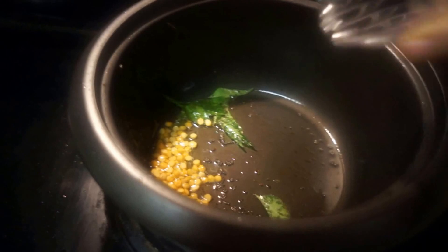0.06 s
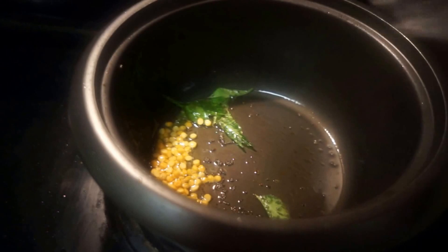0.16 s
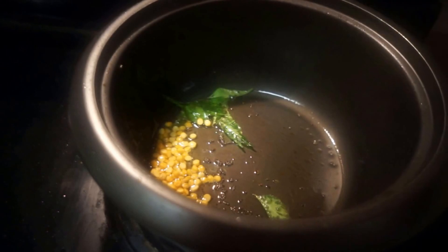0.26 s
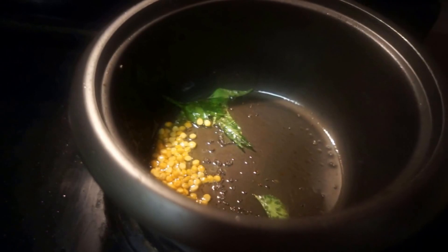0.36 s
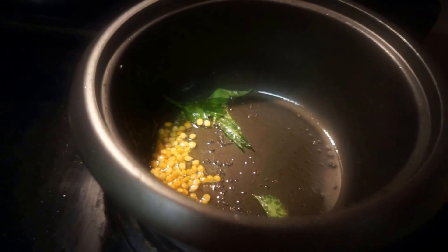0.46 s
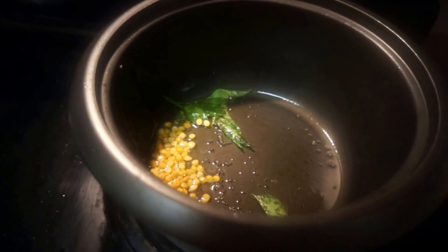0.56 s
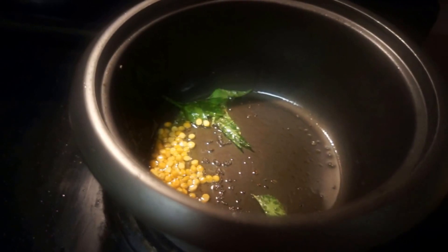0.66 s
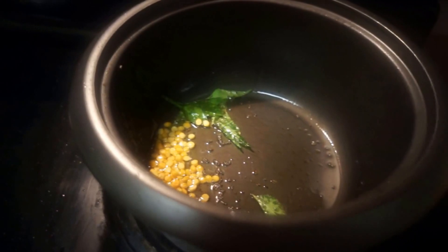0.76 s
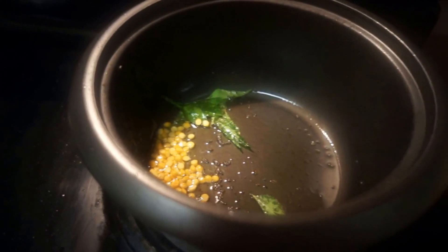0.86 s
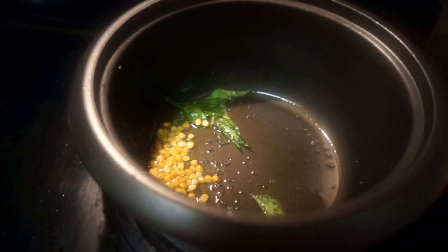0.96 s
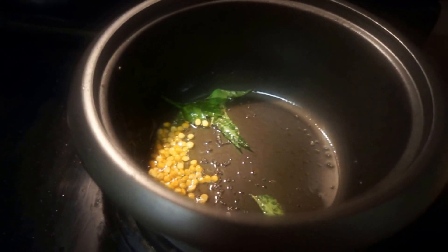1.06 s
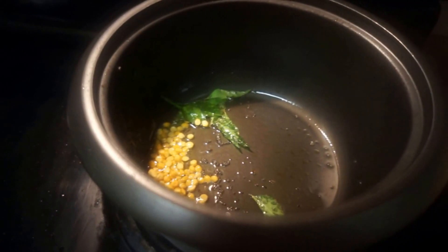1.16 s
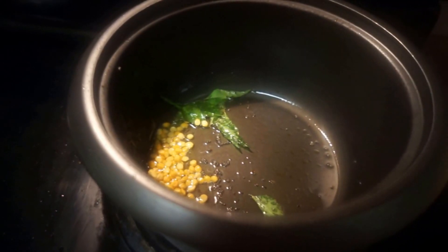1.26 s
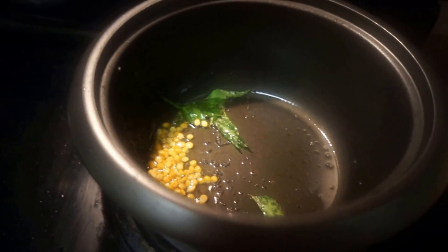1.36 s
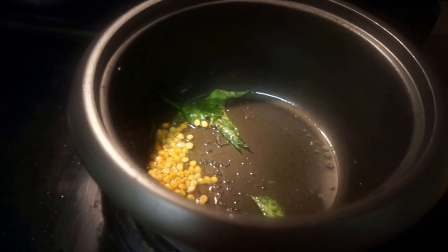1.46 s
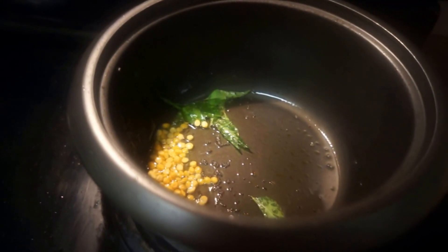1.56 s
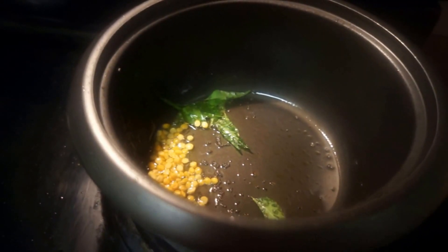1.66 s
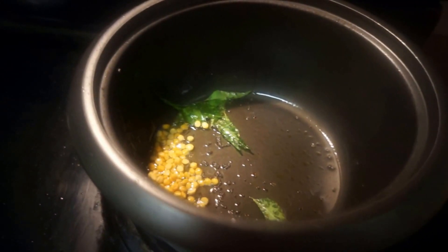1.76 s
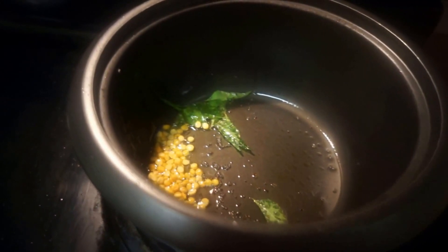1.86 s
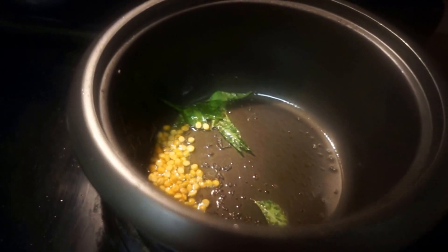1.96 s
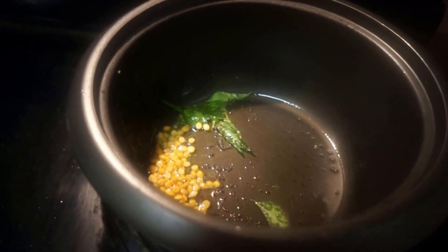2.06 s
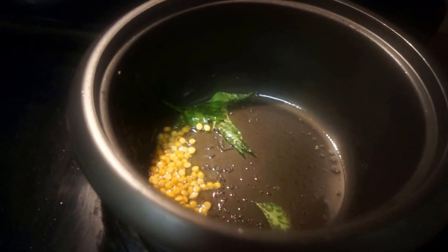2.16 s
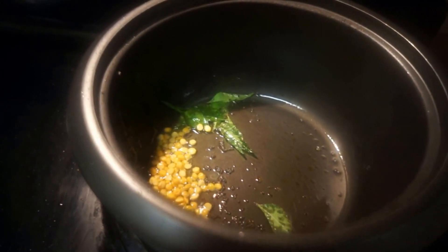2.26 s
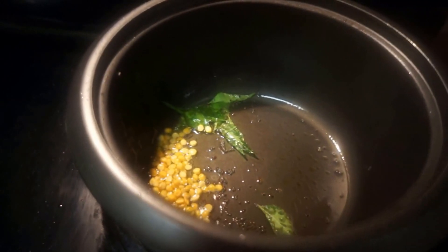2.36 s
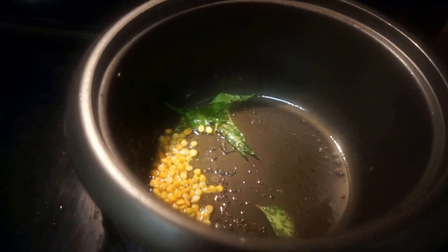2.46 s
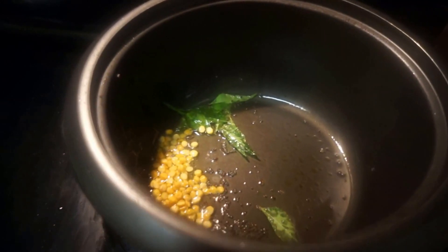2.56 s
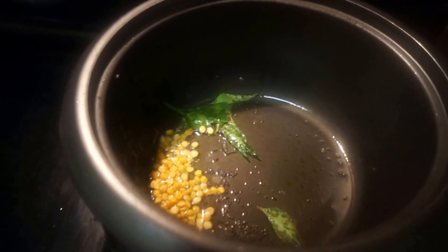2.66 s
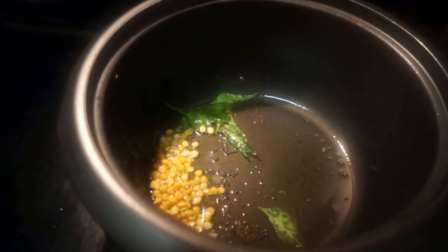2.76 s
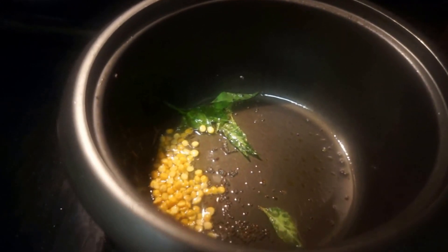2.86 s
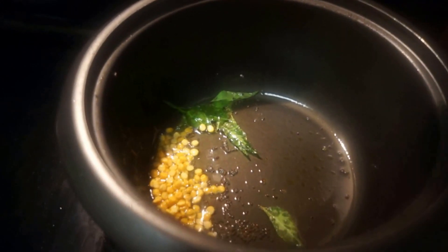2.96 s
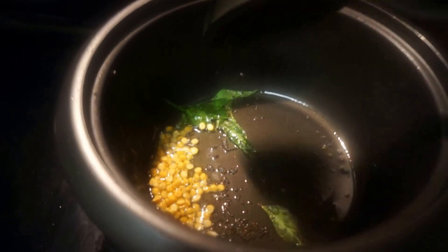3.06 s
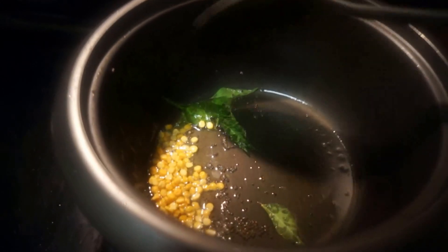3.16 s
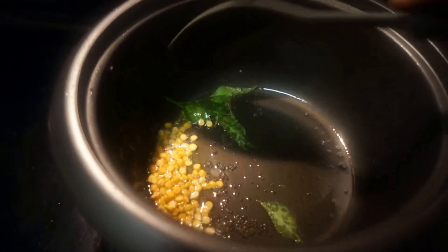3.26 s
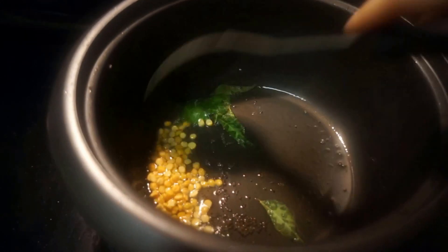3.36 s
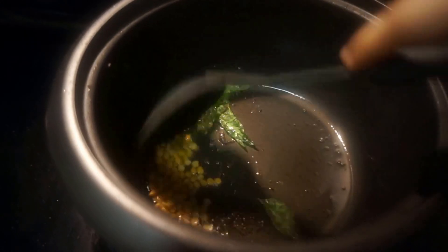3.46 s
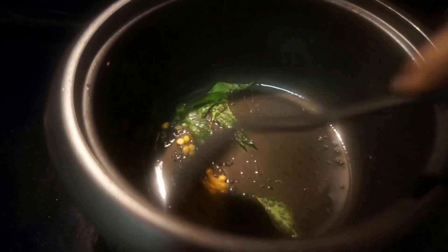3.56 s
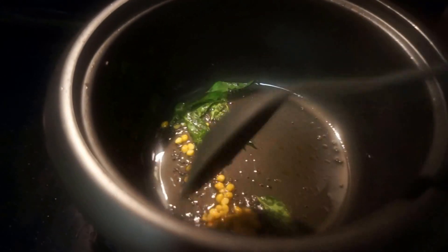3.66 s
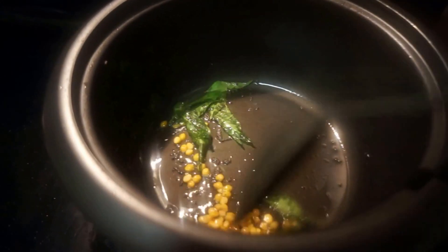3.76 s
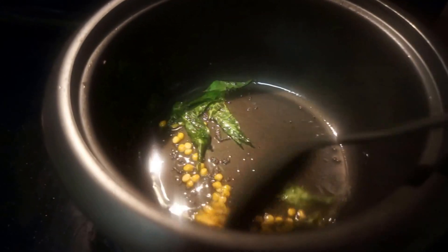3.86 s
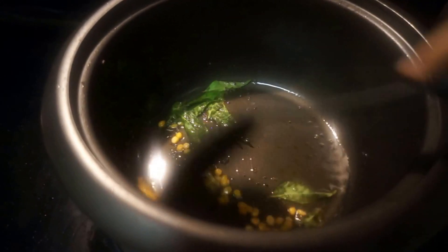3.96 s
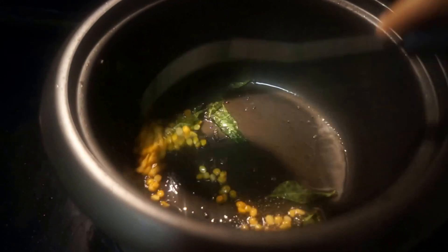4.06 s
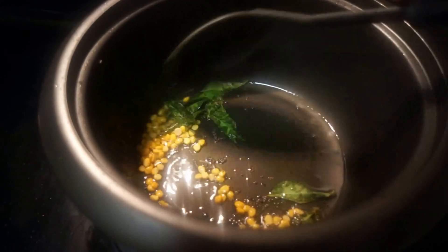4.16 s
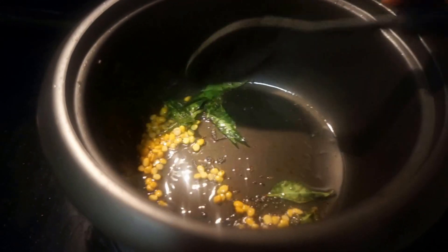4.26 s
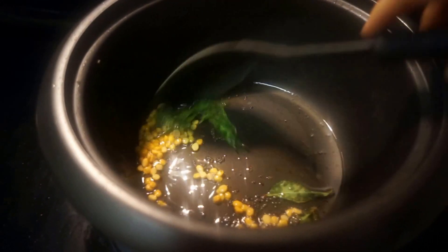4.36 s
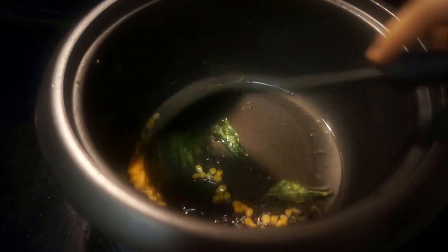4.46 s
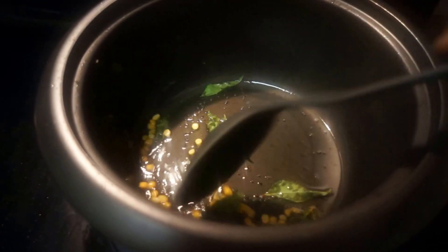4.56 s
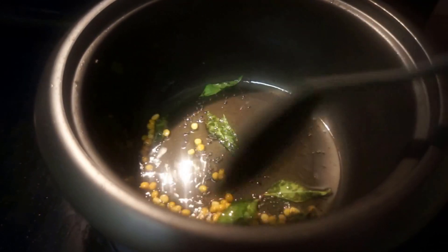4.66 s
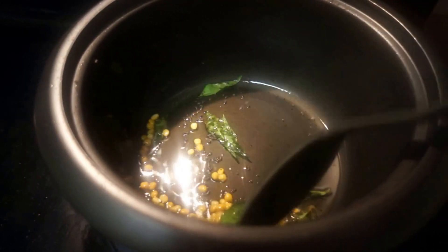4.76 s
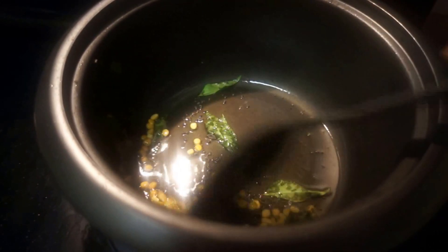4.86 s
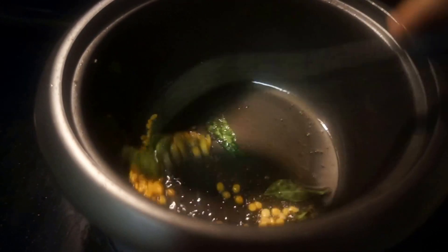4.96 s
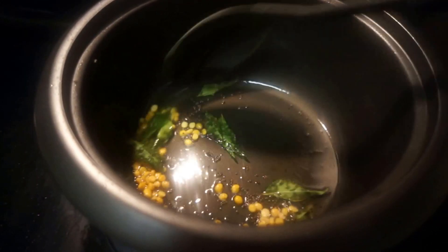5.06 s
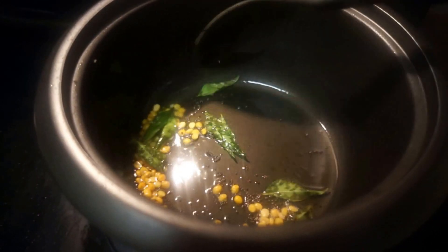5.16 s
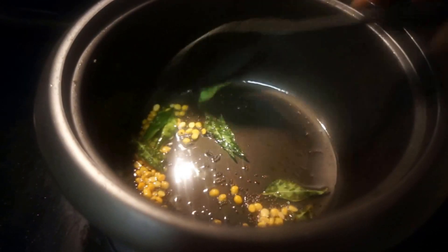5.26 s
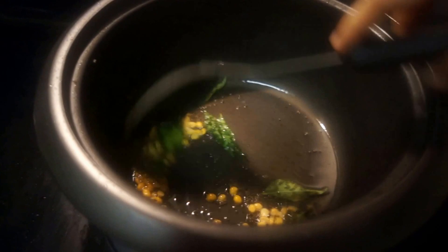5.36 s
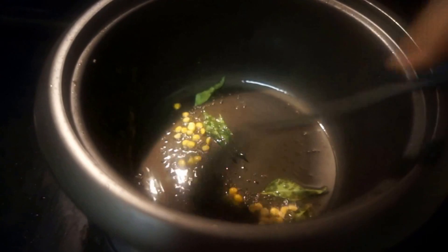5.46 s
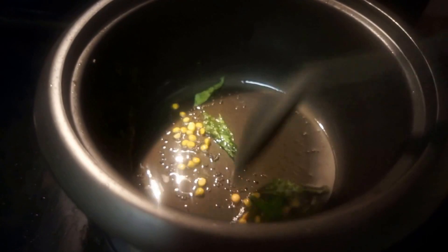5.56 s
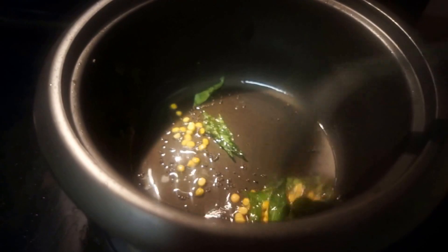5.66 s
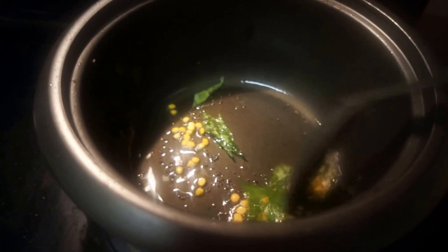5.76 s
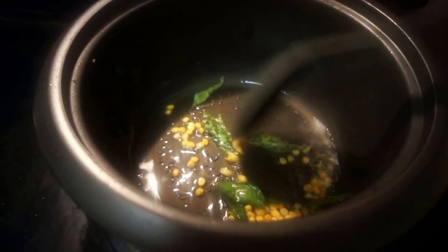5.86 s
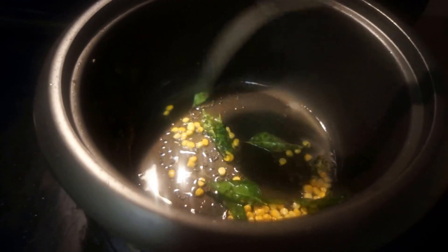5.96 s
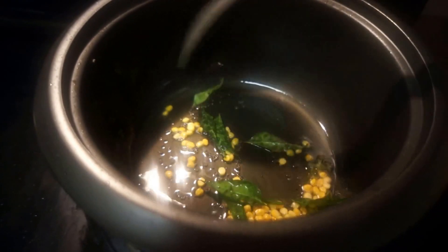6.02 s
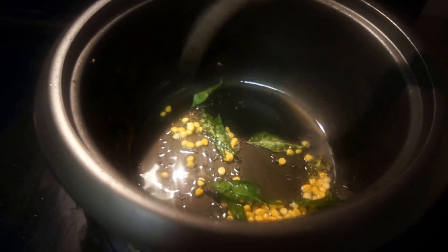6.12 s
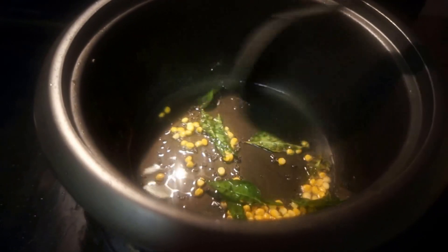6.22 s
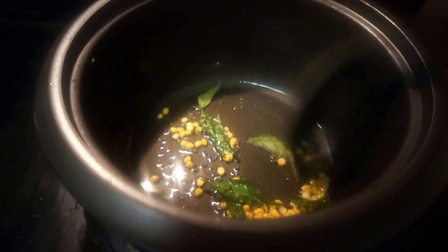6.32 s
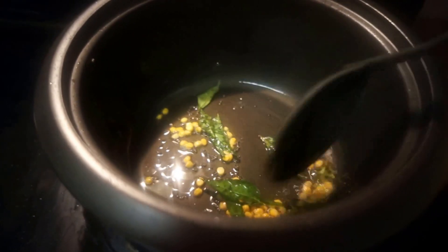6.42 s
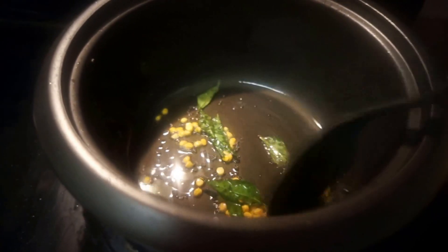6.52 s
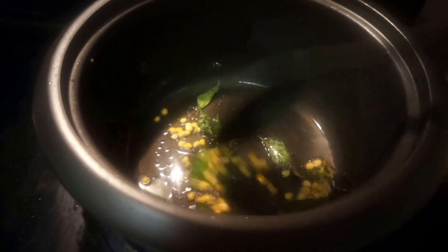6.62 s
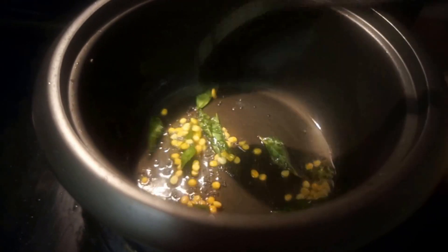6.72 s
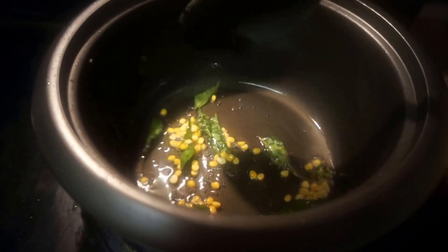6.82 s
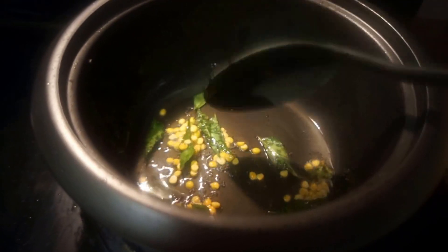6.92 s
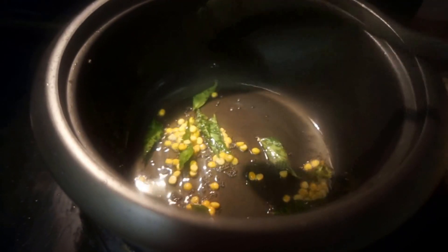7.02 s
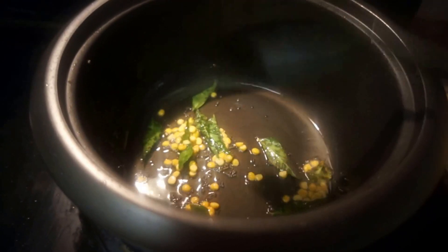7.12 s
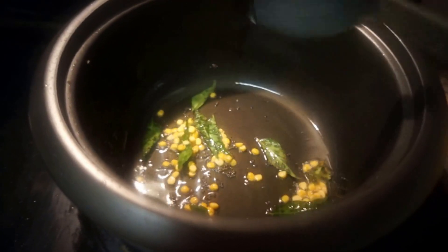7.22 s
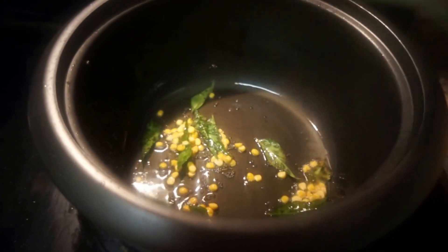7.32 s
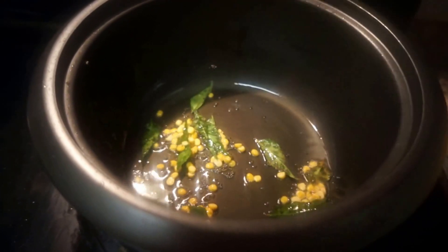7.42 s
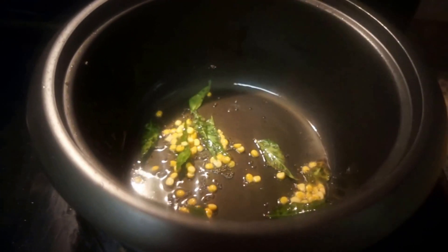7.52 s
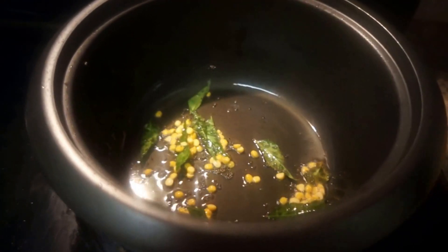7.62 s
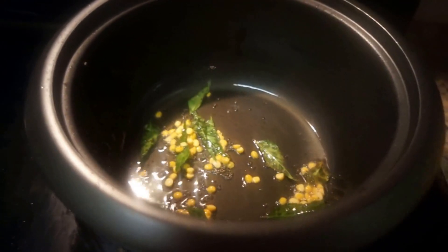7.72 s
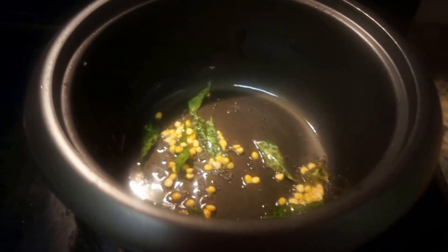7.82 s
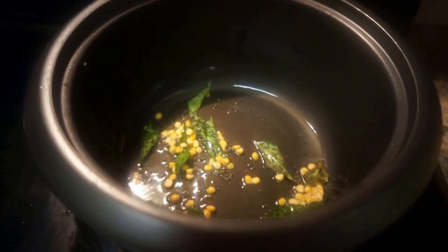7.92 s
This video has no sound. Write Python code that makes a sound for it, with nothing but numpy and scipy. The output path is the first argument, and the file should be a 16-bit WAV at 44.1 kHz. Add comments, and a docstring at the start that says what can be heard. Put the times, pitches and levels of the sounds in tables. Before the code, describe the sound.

Close to a steel pot in a small kitchen, a thin, crisp sizzle with sharp seed pops slowly grows louder. A dish is set down on the counter with a clack and dull knocks. Then a steel spoon stirs in quick strokes, scraping the bottom, knocking hollowly and rattling lentils, its handle ringing briefly on the rim. Stirring stops, the sizzle stays, and something thuds on the counter.

```python
"""Seeds, lentils and leaves fry in hot oil in a steel pot: the sizzle is a dense train of bubble clicks
coloured by the resonances of the air in the pot, and seeds burst as short noise with a pitch of their own.
A steel spoon stirs: random slips scrape the pot's bottom and the spoon's edge, lentils rattle, and the spoon
bumps, clacks, squeaks and taps as struck resonances; friction rings its handle on the rim. A dish and other
things are put down on the counter with dull knocks and a hard tick, a bowl rings faintly, and low noise
fills a small kitchen."""
import sys
import numpy as np
from scipy import signal
from scipy.fft import rfft, irfft, next_fast_len
from scipy.io import wavfile

SR = 44100
rng = np.random.default_rng(int(sys.argv[2]) if len(sys.argv) > 2 else 0)


def master_out(mix):
    """Clip the mix to full scale and print it as 16-bit PCM to the path in sys.argv[1]."""
    frames = np.transpose(np.atleast_2d(mix))
    ceiling = np.clip(frames, -1, 1)
    pcm = np.round(ceiling * 32767).astype(np.int16)
    wavfile.write(sys.argv[1], SR, pcm)


N = 352270

# Levels are those of the separate layers, ahead of the room and of the compression in record().
# Low noise of burner and house, its spectrum: (frequency [Hz], relative density [dB])
RUMBLE_SPECTRUM = [(12, -22), (20, 2.5), (87, -1), (123, 0.5), (196, -8), (340, -12.5), (560, -9.5),
                   (850, -12.5), (1160, -16.5), (2500, -19), (3250, -48), (5500, -120)]
# Levels of sizzle and low noise as heard, lifted by the recorder's rising gain:
# (time [s], sizzle level [dB], rumble level [dB])
STEADY_LEVELS = [(0.0, -53, -61.5), (1.31, -49.5, -54.5), (1.95, -48, -53), (2.39, -45.5, -49),
                 (2.77, -42.5, -50.5), (3.25, -46.5, -46.5), (5.0, -39.5, -43), (6.95, -37, -43.5),
                 (7.988, -36.5, -45)]
# Things put down on the counter: (time [s], peak [dB], centre [Hz], t60 [s], at most 0.4 in use)
COUNTER_KNOCKS = [(1.353, -39, 179, 0.055), (1.373, -39, 546, 0.17), (1.471, -30, 600, 0.079),
                  (1.485, -25.5, 560, 0.059), (1.96, -30.5, 665, 0.096), (2.095, -32.5, 91, 0.04),
                  (2.29, -45, 228, 0.61), (2.357, -27.5, 337, 0.43), (2.47, -36, 870, 0.22),
                  (7.798, -29.5, 627, 0.29), (7.912, -22, 590, 0.2)]
# The dish lands and rocks: (time [s], peak [dB])
DISH_HITS = [(1.5051, -11.5), (1.513, -18), (1.532, -19.5)]
# Resonances of the dish: (frequency [Hz], width [Hz], gain [dB])
DISH_MODES = [(600, 90, 0), (850, 200, -3), (1195, 60, 6), (1400, 60, 7), (1453, 18, 12), (1550, 60, 4),
              (1790, 70, 3), (1960, 120, 2), (2760, 700, -10), (4810, 62, -12)]
# A small steel bowl rings in the hand, one row: (time [s], peak [dB], frequency [Hz], t60 [s])
BOWL_RING = (.07, -59, 1850, 3.0)
# The handle slides on the rim:
# (time [s], duration [s], hiss level [dB], ringing drive [dB], tilt of the ringing [dB per octave])
HANDLE_SLIDES = [(3.262, 0.165, -34, -54.5, -3.5), (6.225, 0.112, -21.5, -37, 0.5)]
# Modes of the spoon: (frequency [Hz], gain [dB])
SPOON_MODES = [(1846, 0), (2310, -6), (2557, -3), (3120, -6), (3402, -6), (3741, -3), (4210, -9), (5082, 2),
               (5467, -2), (5618, 3), (5905, -6), (6223, -5), (6519, 2), (6799, 1), (7881, -2), (9588, -7)]
# Hard ticks: a clack at the counter, then the spoon's edge or a lentil on steel:
# (time [s], peak [dB], pitch [Hz])
HARD_TICKS = [(2.359, -30.5, 1600), (3.3565, -22, 5400), (3.394, -9, 2800), (3.823, -28, 1940),
              (3.929, -17, 2320), (4.3869, -14, 5060), (5.2874, -11, 3390), (5.2896, -10.5, 2200),
              (5.727, -20, 1800), (5.7438, -15.5, 1800), (5.7602, -8.5, 1780), (6.1308, -12.5, 1680),
              (6.504, -20, 1850), (6.551, -10, 1760), (6.691, -14.5, 1560), (6.767, -19, 1610),
              (6.838, -19, 1590)]
# The spoon bumps the bottom, or its edge squeaks and taps (the high pitches):
# (time [s], peak [dB], pitch [Hz])
SPOON_BUMPS = [(3.383, -17.5, 450), (3.464, -1.5, 594), (3.546, -4.5, 553), (3.671, -14.5, 566),
               (3.848, -6, 540), (3.982, -3.5, 620), (4.299, -3.5, 617), (4.345, -7, 530), (4.436, -4, 600),
               (4.483, 0, 570), (4.887, -11, 576), (4.919, -11, 676), (5.343, -5, 580), (5.363, -2.5, 600),
               (5.378, -2.5, 576), (5.405, -2, 600), (5.472, -2.5, 597), (5.487, -6.5, 770),
               (5.562, -12.5, 920), (5.621, -14, 810), (5.759, -20, 706), (5.778, -5.5, 760),
               (5.841, -10, 740), (6.127, -20.5, 380), (6.178, -3, 710), (6.193, -4.5, 614),
               (6.204, -5, 555), (6.277, -11.5, 585), (6.288, -10.5, 710), (6.326, -6, 1776),
               (6.346, -22, 1810), (6.549, -12, 367), (6.575, -7.5, 437), (6.692, -14, 640),
               (6.764, -17, 600), (6.799, -21, 615), (6.836, -16.5, 675), (6.969, -30.5, 1610),
               (7.04, -30.5, 1620), (7.114, -30.5, 565), (7.176, -35.5, 898), (7.214, -34, 816),
               (7.243, -33.5, 510)]
# Strokes of the spoon: (landing time [s], push duration [s], scrape of the bottom [dB],
# grind of the edge [dB], rattle of the lentils [dB], fade [dB per s])
SPOON_STROKES = [(3.364, 0.031, -29, -25, -32, 253), (3.445, 0.072, -17.5, -27, -29.5, 68),
                 (3.82, 0.12, -16, -22, -25.5, 127), (4.17, 0.12, -38.5, -41.5, -62.5, 152),
                 (4.294, 0.11, -23.5, -31, -38, 150), (4.378, 0.15, -22, -28.5, -26, 120),
                 (4.761, 0.14, -21, -23.5, -25, 79), (5.171, 0.048, -23.5, -37, -35, 202),
                 (5.274, 0.057, -24.5, -25, -26.5, 227), (5.352, 0.16, -20, -24, -26.5, 83),
                 (5.741, 0.1, -16, -23, -34, 82), (6.116, 0.024, -22.5, -35, -22.5, 200),
                 (6.167, 0.16, -20.5, -26, -55, 144), (6.494, 0.076, -28, -23.5, -28, 203),
                 (6.545, 0.062, -17, -21.5, -29.5, 107), (6.751, 0.015, -27, -51, -48, 64)]
# Level gained while the spoon speeds up: (bottom [dB], edge [dB], lentils [dB])
SPEED_UP_DB = [4, 4.5, 8]
# Resonances of the pot's bottom and wall: (frequency [Hz], width [Hz], gain [dB])
BOTTOM_MODES = [(89, 38, -16.5), (219, 35.5, -9.5), (329.7, 42, -6.5), (406.7, 13.3, 0), (538, 62, -1.5),
                (600, 58.5, -0.5), (766.5, 30, -1), (850, 144, -9), (1023, 81, -6.5), (1224, 192, -11)]
# Resonances heard at the spoon's edge: (frequency [Hz], width [Hz], gain [dB])
EDGE_MODES = [(1640, 92, -8), (1810, 40, 0), (1847, 204, -6.5), (2400, 146, -9), (2850, 1600, -15)]
# Resonances of the air inside the pot: (frequency [Hz], width [Hz], gain [dB])
AIR_MODES = [(1810, 174, -7), (3830, 2470, -6), (4050, 180, 2.5), (4940, 310, -10.5), (5706, 240, 4.5),
             (7320, 620, -2), (8080, 100, 7.5), (8550, 1670, -2.5), (10915, 360, -10.5)]
# Bursting seeds, and a few low clacks of the spoon:
# (time [s], peak [dB], own pitch [Hz], share of that pitch against the crack [dB])
POPS_AND_CLACKS = [(0.0218, -15, 9460, -2.5), (0.07, -21, 8200, 17), (0.241, -26, 9000, 5),
                   (0.292, -23, 5700, -8), (0.366, -27, 9150, 0), (0.42, -23.5, 2400, -4.5),
                   (0.5166, -11.5, 8160, -1), (0.624, -22, 8240, -3), (0.741, -34.5, 7520, -5),
                   (0.777, -8.5, 4030, 0.5), (1.003, -23, 9700, 0), (1.3098, -15, 8740, 0.5),
                   (1.3313, -16, 6300, -11), (1.741, -23, 7740, 10), (1.9625, -14.5, 4000, 4.5),
                   (2.119, -8.5, 6540, 2), (2.327, -30, 5960, -29), (2.5043, -13.5, 5900, 6),
                   (2.586, -28, 8250, -12), (2.7121, -7, 3400, 3.5), (3.375, -10.5, 5200, 2),
                   (3.7123, -10, 10360, 18), (3.751, -3.5, 7800, 4.5), (3.8113, -9, 6750, 12.5),
                   (4.0058, -7, 7560, 9), (4.052, -7, 7950, -20), (4.101, -12, 8250, 5),
                   (4.1404, -21, 7900, 34), (4.1565, -9.5, 9600, 7), (4.2, -7, 8950, 22),
                   (4.27, -14.5, 7450, 5), (4.346, -9.5, 7860, 30), (4.978, -10.5, 7100, 5),
                   (5.09, -4, 4000, -4.5), (5.177, -15, 7880, -15), (5.2214, -13, 8450, 5),
                   (5.235, -2.5, 4900, -2), (5.844, -8, 3580, 0), (5.863, -2.5, 2400, -4),
                   (6.0357, -12, 5900, 7), (6.092, -6, 7700, 7), (6.1514, -9.5, 7700, 51),
                   (6.353, -0.5, 4300, -6), (6.459, -11, 4220, 2), (6.74, -10, 9300, 9),
                   (6.8018, -8.5, 2400, -3), (7.2806, -8, 9600, -8)]
# Thin rings of the pot's wall, strongest for pops of a near pitch: (frequency [Hz])
WALL_RINGS_HZ = [3187, 3338, 3920, 4180]

KITCHEN_T60_S, WALL_CUT_HZ = 0.56, 1600   # reverberation of the lows; above the cut it shortens
SPOON_T60_S = 0.1
SLIDE_EDGE_S, HISS_FALLS_DB = 0.0073, 9
LAND_S, SPEED_UP_S = 0.0034, 0.1          # the spoon bites at once, then gathers speed
BUMP_WIDTH_HZ, BUMP_RUB_DB, BUMP_EDGE_DB = 270, -25.5, -13.5   # damped ring, friction, spoon's edge
WALL_WIDTH_HZ = 20
MIC_TOP_HZ, CUTOFF_HZ = 11050, 12349


def amp(db):
    """Level as amplitude: 20 dB is a factor of ten."""
    return 10 ** (np.asarray(db) / 20)


def rms_one(x):
    """Normalization to unit effective value."""
    return x / np.sqrt(np.mean(x ** 2) + 1e-20)


def in_time(rows):
    """Linear interpolation of a table's columns, sample by sample."""
    times, *columns = np.transpose(rows)
    return [np.interp(np.arange(N) / SR, times, column) for column in columns]


def drift(rate_hz):
    """Low-passed noise: slow chance of spread 1, drawn at every 20th sample."""
    r = np.exp(-40 * np.pi * rate_hz / SR)
    noise = rng.standard_normal(N // 20 + 2002)
    slow = signal.lfilter([1], [1, -2 * r, r * r], noise)[2000:]   # the filter has settled
    return np.interp(np.arange(N) / 20, np.arange(len(slow)), rms_one(slow))


def resonate(x, hz, width_hz):
    """Simple damped resonator: a pole pair with a gain near 1 at its peak."""
    r = np.exp(-np.pi * width_hz / SR)
    zeros = [(1 - r * r) / 2, 0, (r * r - 1) / 2]
    poles = [1, -2 * r * np.cos(2 * np.pi * hz / SR), r * r]
    return signal.lfilter(zeros, poles, x)


def body(x, modes, wander_db=0):
    """Modal superposition with alternating signs; a moving contact drives each mode more or less."""
    wander = [amp(wander_db * drift(8.4)) if wander_db else 1 for mode in modes]
    out = 0
    for k, (hz, width_hz, db) in enumerate(modes):
        out = out + (-1) ** k * amp(db) * resonate(x * wander[k], hz, width_hz)
    return out


def grains(per_s, spread_db, clump_db, clump_rate):
    """Random impulse process: clicks of uneven size whose level drifts, so that they clump."""
    sizes = amp(spread_db * np.minimum(rng.exponential(1, N), 5)) * rng.choice([-1, 1], N)
    present = rng.random(N) < per_s / SR
    return sizes * present * amp(clump_db * drift(clump_rate)) + 1e-18


def burst(t60, size=4000):
    """Exponential decay of noise that starts at once, with t60 held between 0.004 and 0.4 s."""
    decay_db = -60 * np.arange(size) / (np.clip(t60, .004, .4) * SR)
    return rng.standard_normal(size) * amp(decay_db)


def blow(t60, rub_db, size=4000):
    """Impulsive contact: one clean click with dying noise."""
    click = np.arange(size) == 0
    return click + amp(rub_db) * burst(t60, size=size)


def add(out, s, sound, peak_db):
    """Superposition of a sound at time s with the given peak."""
    at = round(s * SR)
    scaled = amp(peak_db) * sound / np.abs(sound).max()
    out[at:at + len(sound)] += scaled[:N - at]


def spread(x, side_db, count=420):
    """Early reflection: an echo, count samples late, reaches the two channels with opposite sign."""
    return rms_one(x) + amp(side_db) * rms_one(np.roll(x, count)) * [[1], [-1]]


def kitchen(x):
    """Reverberation by recirculating delays: ten a channel, duller on every round."""
    size = next_fast_len(N + SR)
    hz = np.fft.rfftfreq(size, 1 / SR)
    t60 = KITCHEN_T60_S / (1 + (hz / WALL_CUT_HZ) ** 2) ** .5
    out = np.zeros((2, len(hz)), complex)
    for k, lag_s in enumerate(rng.uniform(.006, .035, 20)):
        loop = amp(-60 * lag_s / t60) * np.exp(-2j * np.pi * hz * lag_s)
        out[k % 2] += (-1) ** (k // 2) * loop / (1 - loop)
    return irfft(out * rfft(x, size), size)[:, :N]


def rumble(level_db):
    """Spectral shaping of noise: burner and house, a little of it unlike in the two channels."""
    hz, db = np.transpose(RUMBLE_SPECTRUM)
    shape = amp(np.interp(np.log(np.fft.rfftfreq(N, 1 / SR) + 1), np.log(hz), db))
    low_noise = irfft(rfft(rng.standard_normal(N)) * shape, N)
    return amp(level_db) * spread(low_noise, side_db=-11.5, count=SR)


def knocks():
    """Heavily damped impact: dying noise in a wide band; the dish answers with its modes."""
    out = np.zeros(N)
    for s, db, hz, t60 in COUNTER_KNOCKS:
        thud = burst(t60, size=12000)
        for _ in range(2):
            thud = resonate(thud, hz, 0.98 * hz)
        add(out, s, thud, db)
    for s, db in DISH_HITS:
        touch = blow(0.03, rub_db=-20, size=12000)
        ring = body(touch + amp(-26) * burst(0.4, size=12000), DISH_MODES)
        add(out, s, ring + amp(-12.5) * resonate(touch, 1050, 1400), db)
    return out


def bowl():
    """Single mode of vibration: a decaying sine that swells and fades under a smooth window."""
    out = np.zeros(N)
    s, db, hz, t60 = BOWL_RING
    t = np.arange(SR // 3) / SR
    window = np.hanning(len(t)) ** 1.3
    add(out, s, window * amp(-60 * t / t60) * np.sin(2 * np.pi * hz * t), db)
    return out


def handle():
    """Friction excitation: fine rubbing hisses and keeps the spoon's modes ringing, each drifting."""
    t, rub = np.arange(N) / SR, rng.standard_normal(N)
    hiss, ringing, contacts = 0, 0, []
    for s, lasts, hiss_db, *rest in HANDLE_SLIDES:
        contact = np.clip(np.minimum(t - s, s + lasts - t) / SLIDE_EDGE_S, 0, 1)
        contacts.append(contact)
        progress = np.clip((t - s) / lasts, 0, 1)
        hiss = hiss + amp(hiss_db - HISS_FALLS_DB * progress ** 2) * contact
    width_hz = np.log(1000) / np.pi / SPOON_T60_S
    for hz, db in SPOON_MODES:
        drive = 0
        for contact, (*rest, ring_db, tilt_db) in zip(contacts, HANDLE_SLIDES):
            drive = drive + contact * amp(ring_db + tilt_db * np.log2(hz / 4000))
        force = drive * amp(3 * drift(20)) * rub + 1e-18
        # a narrow mode passes little noise power: the root makes up for it
        ringing = ringing + amp(db) * np.sqrt(SR / width_hz) * resonate(force, hz, width_hz)
    return ringing + hiss * rms_one(body(rub, AIR_MODES))


def ticks():
    """Hard, dry contact: a wide resonance that rings only a few cycles."""
    out = np.zeros(N)
    for s, db, hz in HARD_TICKS:
        touch = blow(0.12, rub_db=11)
        colour = body(touch, EDGE_MODES + AIR_MODES)
        add(out, s, resonate(touch, hz, 0.17 * hz) + amp(-14.5) * colour, db)
    return out


def bumps():
    """Damped impact: each contact of the spoon rings near its pitch and wakes pot and spoon's edge."""
    out = np.zeros(N)
    for s, db, hz in SPOON_BUMPS:
        touch = blow(0.1, rub_db=BUMP_RUB_DB)
        near_pitch = resonate(resonate(touch, hz, BUMP_WIDTH_HZ), hz, BUMP_WIDTH_HZ)
        pot = body(near_pitch, BOTTOM_MODES + EDGE_MODES)
        edge = body(touch, EDGE_MODES)
        add(out, s, pot + amp(2.0) * near_pitch + amp(BUMP_EDGE_DB) * edge, db)
    return out


def stroke_levels():
    """Envelope of contact: a stroke lands, swells and, once its push ends, fades; gains of three layers."""
    out, t = np.zeros((3, N)), np.arange(N) / SR
    swell_db = np.array([SPEED_UP_DB]).T
    for s, push_s, *layer_db, fade in SPOON_STROKES:
        landing = np.clip((t - s) / LAND_S, 0, 1)
        slowness = np.clip(1 - (t - s) / SPEED_UP_S, 0, 1)
        lifted_s = np.maximum(t - s - push_s, 0)
        out += landing * amp(np.array([layer_db]).T - swell_db * slowness - fade * lifted_s)
    return out


def stirring():
    """Stick-slip excitation: uneven slips shake bottom and spoon's edge; lentils tick against steel."""
    slips = grains(700, spread_db=3.0, clump_db=2.0, clump_rate=25)
    grit = grains(1700, spread_db=3.3, clump_db=2.4, clump_rate=40)
    taps = grains(3000, spread_db=2.9, clump_db=2.2, clump_rate=40)
    bottom = spread(body(slips, BOTTOM_MODES, wander_db=2.0), side_db=-17.0)
    edge = spread(body(grit, EDGE_MODES, wander_db=1.0), side_db=-10.0)
    rattle = spread(body(taps, AIR_MODES, wander_db=3.5), side_db=-11.5)
    scrape, grind, shake = stroke_levels()
    return scrape * bottom + grind * edge + shake * rattle


def sizzle(level_db):
    """Cavity resonance: steam bubbles burst by the thousand and the air in the pot colours them."""
    fizz = grains(9000, spread_db=1.5, clump_db=.6, clump_rate=40)
    return amp(level_db) * spread(body(fizz, AIR_MODES), side_db=-11.5)


def pops_and_clacks():
    """Impulsive source and coupled modes: a crack through the pot's air, a pitch of its own, wall rings."""
    out = np.zeros(N)
    for s, db, hz, own_db in POPS_AND_CLACKS:
        crack = body(burst(.007, size=9000), AIR_MODES) + amp(-20) * burst(.004, size=9000)
        snap = blow(.04, rub_db=-17, size=9000)
        own = resonate(snap, hz, 0.14 * hz)
        own = own + amp(-33) * resonate(burst(0.4, size=9000), hz, 0.35 * hz)
        wall = sum(amp(rng.normal(5, 2)) * resonate(own, wall_hz, WALL_WIDTH_HZ)
                   for wall_hz in WALL_RINGS_HZ)
        add(out, s, rms_one(crack) + amp(own_db) * rms_one(own + wall), db)
    return out


def scene():
    """Direct and reverberant field: the sources lean a little right; all but sizzle and rumble wake the room."""
    sizzle_db, rumble_db = in_time(STEADY_LEVELS)
    stir = stirring()
    near = pops_and_clacks() + bumps() + ticks() + handle() + bowl()
    counter = knocks()
    room = kitchen(amp(-22.0) * near + amp(-19.5) * counter + amp(-25.5) * stir.mean(axis=0))
    near_echo = amp(-14.5) * np.roll(near, 140) * [[1], [-1]]
    pot = sizzle(sizzle_db) + stir + near + near_echo + rumble(rumble_db)
    return pot * amp([[-.4], [.4]]) + counter * amp([[-1.5], [1.5]]) + room


def record(dry):
    """Dynamic compression: gain ducks after loud moments and recovers; peaks are rounded, the top is cut."""
    level_db = 20 * np.log10(np.abs(dry).max(axis=0) + 1e-9)
    over_db = np.maximum(level_db + 17, 0)
    slope = 22 * np.arange(N) / SR   # the held excess falls by 22 dB per s
    held_db = np.maximum.accumulate(over_db + slope) - slope
    r = np.exp(-1 / (0.028 * SR))    # smoothing over 28 ms
    smooth_db = signal.lfilter([1 - r], [1, -r], held_db)
    ducked = dry * amp(-.3 * smooth_db)
    rounded = .8 * np.tanh(ducked / .8)
    heard = signal.sosfilt(signal.ellip(10, .5, 60, MIC_TOP_HZ, fs=SR, output="sos"), rounded)
    return signal.sosfilt(signal.cheby2(14, 55, CUTOFF_HZ, fs=SR, output="sos"), heard)


dry = scene()
out = record(dry)
master_out(out)
```